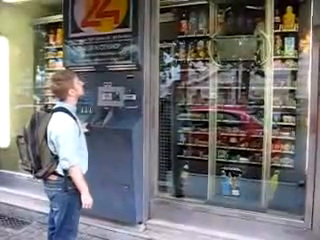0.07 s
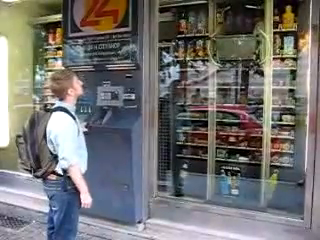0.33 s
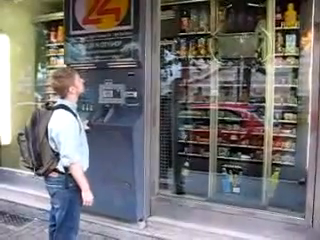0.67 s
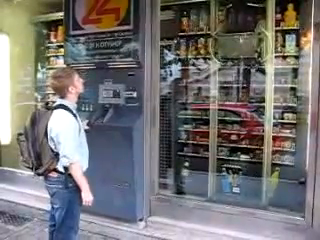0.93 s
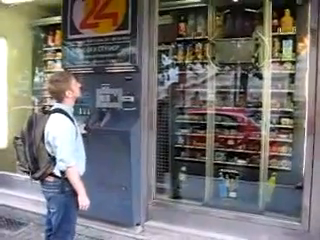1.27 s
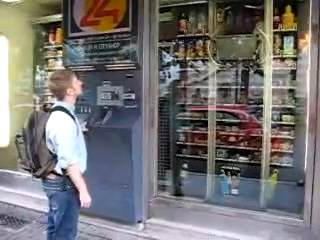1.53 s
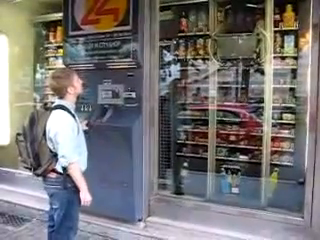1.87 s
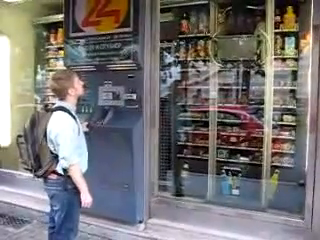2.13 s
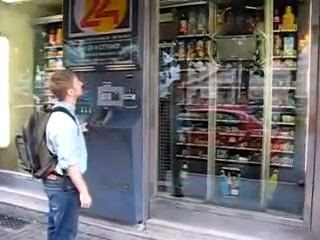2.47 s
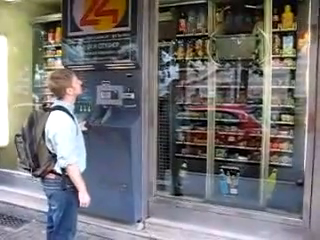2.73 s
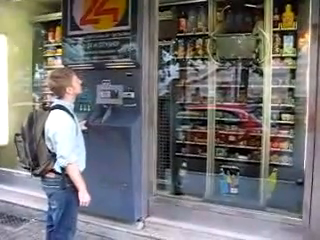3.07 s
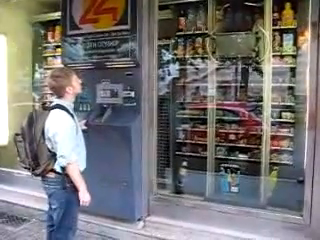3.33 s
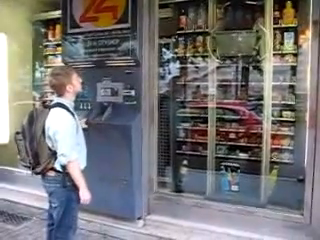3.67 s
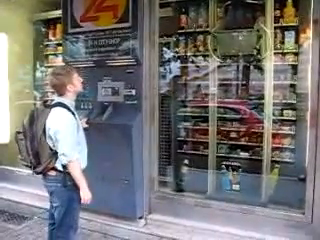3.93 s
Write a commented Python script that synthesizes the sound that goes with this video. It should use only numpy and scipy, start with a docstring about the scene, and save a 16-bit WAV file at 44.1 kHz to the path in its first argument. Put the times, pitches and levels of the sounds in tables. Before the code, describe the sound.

Street traffic rolls by with tyre noise and low engine hum, slowly receding.

```python
"""City traffic heard from the pavement in front of a shop window.
At the start a brake squeaks faintly twice as its pad catches the disc, and a car rolls by on singing tyres.
One engine idles nearby; another drones, fades within a second and swells once more as it moves off.
Toward the middle, engines farther away growl and hum, and then their exhausts boom briefly.
To the end, the roar of tyres on asphalt slowly recedes over the low rumble of the street."""
import sys
import numpy as np
from scipy import signal
from scipy.fft import rfft, irfft
from scipy.io import wavfile

SR = 44100
rng = np.random.default_rng(int(sys.argv[2]) if len(sys.argv) > 2 else 0)


def wrap_up_sound(samples):
    """Save the sound to the file named by the first command line argument, as 16-bit audio."""
    columns = np.atleast_2d(samples).T
    # keep every value between -1 and 1, then stretch to whole-number steps
    tamed = np.clip(columns, -1, 1)
    steps = np.round(tamed * 32767).astype(np.int16)
    wavfile.write(sys.argv[1], SR, steps)


N = 176400
T = np.arange(N) / SR

# tyre roar on asphalt, from low to high pitch: f/Hz, level/dB
ROAR_SPECTRUM = [(200, -13), (380, -4.5), (520, -2), (700, -2.06), (900, -0.6), (1120, -3), (1350, -12.5),
                 (1800, -23.5), (3000, -63)]
# hiss of the tyre treads: f/Hz, level/dB
TREAD_SPECTRUM = [(800, -16.5), (1400, -1), (1800, 1), (2150, -3), (2700, -2.5), (3000, -5), (3400, -11.5),
                  (3900, -12), (4500, -19.5), (5300, -27.5), (6300, -36), (7100, -58)]
# the traffic draws away: t/s, relative roar level/dB, relative hiss level/dB
TYRE_LEVELS = [(0, -23.5, -30), (.45, -24.5, -30), (.72, -26, -32.5), (.95, -24, -32), (1.65, -26, -31.3),
               (1.9, -25, -32), (2.3, -26, -33.5), (2.7, -27.5, -35), (3.3, -29, -36), (4, -30.5, -38)]
# where the nearest car's tyres ring: f/Hz, width/Hz, level/dB
NEAR_CAR_RESONANCES = [(702, 120, -4.5), (870, 190, -1)]
# loudness of the idling engine: t/s, level/dB
IDLE_LEVEL = [(0, -25.5), (.15, -26), (.5, -35), (.85, -35), (1.2, -29.5), (1.9, -28.5), (2.35, -35.5),
              (3, -28.5), (4, -28)]
# the tones in its sound: multiple of the firing rate, level/dB
IDLE_TONES = [(1, 1), (2, -14), (3, -19), (5, -17.5), (6, -25.5), (7, -17)]
# firing rate and loudness of the engine that moves off: t/s, f/Hz, level/dB
DRONE_COURSE = [(0, 88.6, -23.5), (.2, 89.8, -26), (.35, 89.38, -20.5), (.66, 89.42, -19.5),
                (.9, 86.26, -36), (1.62, 88, -40.5), (1.8, 87.66, -26), (1.98, 87.2, -29.5),
                (2.35, 86.9, -42.5), (4, 83.8, -40.5)]
# the tones in its sound: multiple of the firing rate, level/dB
DRONE_TONES = [(1, -1.5), (1.5, -15.5), (2, -15.5), (3, -19)]
# start and strength of each brake squeak: t/s, level/dB
SQUEAKS = [(0.156, -48), (0.302, -50.5)]
# where the brake disc rings: f/Hz, level/dB
BRAKE_TONES = [(4525, -3), (6505, -23)]
# where the far exhausts boom: f/Hz, width/Hz, level/dB
BOOM_RESONANCES = [(74.2, 7.2, 0), (140, 10.2, -2.5)]
# loudness of the booms: t/s, level/dB
BOOM_LEVEL = [(0, -26.5), (.7, -32), (1.1, -33.5), (1.9, -34.5), (2.3, -29), (2.7, -36), (3, -37), (4, -39)]
# where hard-working engines growl: f/Hz, width/Hz, level/dB
GROWL_RESONANCES = [(275, 40, -3.5), (314.5, 47.5, 1)]
# loudness of the growl: t/s, level/dB
GROWL_LEVEL = [(0, -34.5), (.9, -35), (1.4, -30.5), (1.85, -30.5), (2.05, -37.5), (2.8, -36), (3.2, -40),
               (4, -43)]
# loudness of a thin engine hum: t/s, level/dB
HUM_LEVEL = [(0, -43.5), (.9, -37.5), (1.3, -35.5), (1.85, -33), (2.1, -47), (2.9, -38.5), (3.6, -39),
             (4, -44)]
# its single tone: multiple of its pitch, level/dB
HUM_TONES = [(1, 0)]
# rumble of the street: f/Hz, level/dB
RUMBLE_SPECTRUM = [(10, -18.5), (20, -1), (29, 10.5), (40, 1.5), (62, 10.5), (80, 0.5), (115, 6.5),
                   (160, -0.5), (220, 6.5), (340, -5), (430, -2.5), (900, -56)]
# far hiss of the street: f/Hz, level/dB
FAR_HISS_SPECTRUM = [(2500, -12.5), (4000, 0), (5300, -10.5), (6300, -19.5), (7100, -32)]


def tyres():
    """Tyres roar on the asphalt and their treads hiss; both sink as the cars draw away."""
    roar_db, hiss_db = in_time(TYRE_LEVELS)
    roar = from_db(roar_db + 0.77) * shaped_noise(ROAR_SPECTRUM, flutter_db=0.5)
    hiss = from_db(hiss_db - 0.32) * shaped_noise(TREAD_SPECTRUM, flutter_db=0.1)
    return roar + hiss


def near_car(closest_s=0.38, fall_to_half_s=0.45, top_db=-28.5):
    """The tyres of the nearest car sing in a narrow range of pitch, loudest as it goes by."""
    relative_distance = np.hypot(1, (T - closest_s) / fall_to_half_s)
    return from_db(top_db) / relative_distance ** 2 * ringing(NEAR_CAR_RESONANCES)


def idling_engine(firing_hz=44.2):
    """An engine nearby fires slowly, making a deep note that swells and dips."""
    level_db, = in_time(IDLE_LEVEL)
    return from_db(level_db) * engine_note(firing_hz, IDLE_TONES, wander=0.024, waver_db=1.7)


def leaving_engine():
    """An engine drones and fades as it moves off; its note sinks a little as it fires more slowly."""
    firing_hz, level_db = in_time(DRONE_COURSE)
    return from_db(level_db) * engine_note(firing_hz, DRONE_TONES, wander=0.0062, waver_db=0.9)


def brake(rise_s=0.012, decay_s=0.066, wander=0.006):
    """The pad catches the disc twice; its wavering tones start quickly and die away."""
    loudness = np.zeros(N)
    for start_s, db in SQUEAKS:
        rise = np.clip((T - start_s) / rise_s, 0, 1)
        decay = np.exp(-np.maximum(T - start_s - rise_s, 0) / decay_s)
        loudness += from_db(db) * rise * decay
    wobbly_time = np.cumsum(1 + wander * drift(90)) / SR  # bends both tones together
    disc = sum(from_db(db) * np.sin(2 * np.pi * hz * wobbly_time) for hz, db in BRAKE_TONES)
    return loudness * rms_one(disc)


def exhaust_booms():
    """The exhausts of vehicles farther off boom at two low pitches."""
    level_db, = in_time(BOOM_LEVEL)
    return from_db(level_db) * ringing(BOOM_RESONANCES)


def engine_growl():
    """Engines that are working hard make a rough growl."""
    level_db, = in_time(GROWL_LEVEL)
    return from_db(level_db) * ringing(GROWL_RESONANCES)


def engine_hum(pitch_hz=251):
    """A far engine hums on one thin, wavering tone."""
    level_db, = in_time(HUM_LEVEL)
    return from_db(level_db) * engine_note(pitch_hz, HUM_TONES, wander=0.008, waver_db=2.0)


def street(rumble_db=-28.5, fade_db_per_s=0.62, hiss_db=-59):
    """Far traffic blends into a slowly fading rumble and a faint, steady hiss."""
    rumble = from_db(rumble_db - fade_db_per_s * T) * shaped_noise(RUMBLE_SPECTRUM, flutter_db=0.5)
    hiss = from_db(hiss_db) * shaped_noise(FAR_HISS_SPECTRUM, flutter_db=-0.3)
    return rumble + hiss


def engine_note(hz, tones, wander, waver_db):
    """Tones at multiples of a wandering firing rate, each wavering in strength."""
    phase = 2 * np.pi * np.cumsum(hz * (1 + wander * drift(5))) / SR
    note = np.zeros(N)
    for multiple, db in tones:
        strength = from_db(db + waver_db * drift(11))
        note += strength * np.sin(multiple * phase + 2 * np.pi * rng.random())
    return rms_one(note)


def ringing(resonances):
    """Noise rings at each given pitch; the smaller the width, the clearer the note."""
    sound = np.zeros(N)
    for hz, width_hz, db in resonances:
        r = np.exp(-np.pi * width_hz / SR)
        resonator = [1 - r, 0, r - 1, 1, -2 * r * np.cos(2 * np.pi * hz / SR), r * r]
        ring = signal.sosfilt([resonator, resonator], rng.standard_normal(N + SR))
        sound += from_db(db) * rms_one(ring[SR:])  # skip a second while the ringing builds up
    return rms_one(sound)


def shaped_noise(spectrum, flutter_db):
    """Noise with the given strength at each pitch and a slightly unsteady level."""
    hz, db = np.transpose(spectrum)
    all_hz = np.maximum(np.arange(N // 2 + 1) * SR / N, 1)
    gain = from_db(np.interp(np.log(all_hz), np.log(hz), db))
    noise = irfft(rfft(rng.standard_normal(N)) * gain, N)
    return rms_one(noise) * from_db(flutter_db * drift(7.1))


def drift(rate_hz):
    """A smooth random wander of typical size 1; a higher rate makes it quicker."""
    r = np.exp(-80 * np.pi * rate_hz / SR)
    jolts = rng.standard_normal(N // 40 + 2002)  # one every 40 samples
    slow = signal.lfilter([1], [1, -2 * r, r * r], jolts)[2000:]
    return np.interp(np.arange(N) / 40, np.arange(len(slow)), rms_one(slow))


def in_time(rows):
    """Join a table's points with straight lines, giving each column a value at every sample."""
    times, *columns = np.transpose(rows)
    return [np.interp(T, times, column) for column in columns]


def from_db(db):
    """Turn decibels into a number to multiply by."""
    return 10 ** (np.asarray(db) / 20)


def rms_one(x):
    """Scale a signal so that its typical size (root mean square) is 1."""
    return x / np.sqrt(np.mean(x ** 2) + 1e-20)


def scene():
    """The whole street at one microphone."""
    near = tyres() + near_car() + idling_engine() + leaving_engine() + brake()
    far = exhaust_booms() + engine_growl() + engine_hum() + street()
    return (near + far)[None]


def record(dry):
    """The highest treble is cut off steeply."""
    cutoff_hz = 7150
    return signal.sosfilt(signal.ellip(12, .1, 90, cutoff_hz, fs=SR, output="sos"), dry)


dry = scene()
out = record(dry)
wrap_up_sound(out)
```